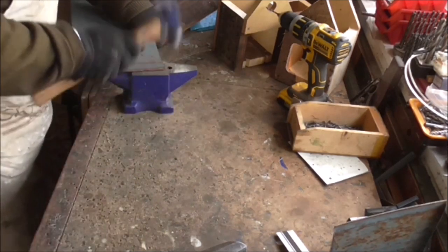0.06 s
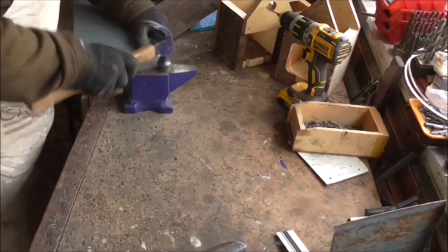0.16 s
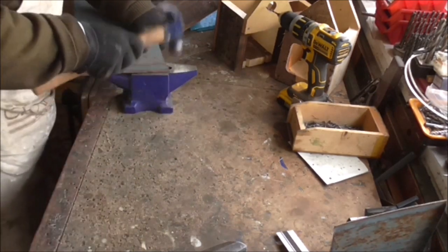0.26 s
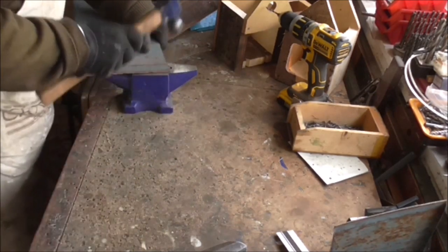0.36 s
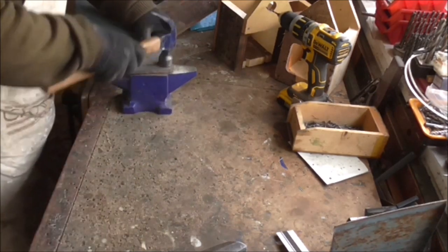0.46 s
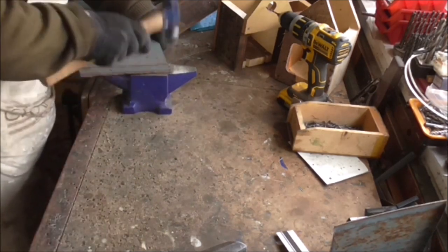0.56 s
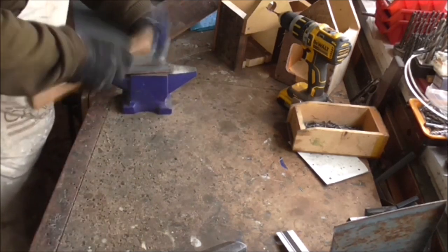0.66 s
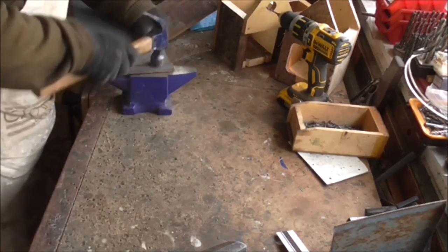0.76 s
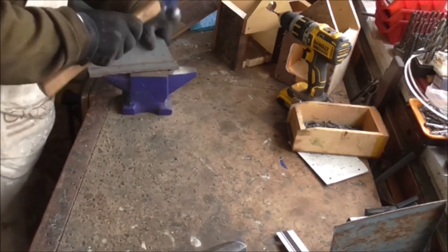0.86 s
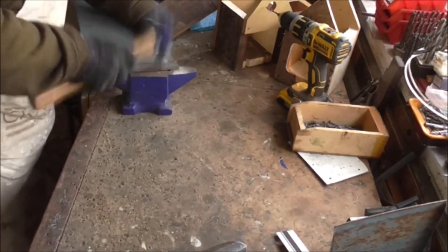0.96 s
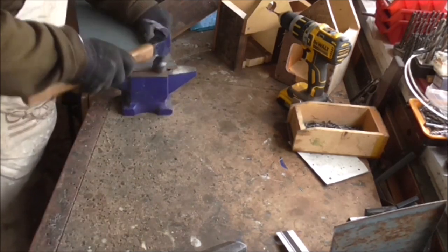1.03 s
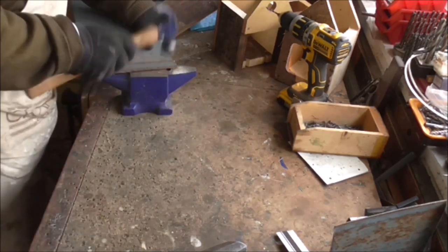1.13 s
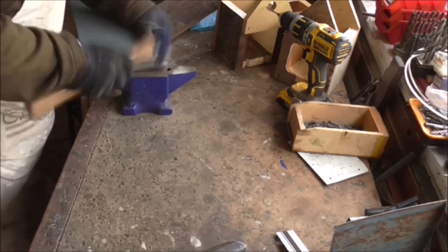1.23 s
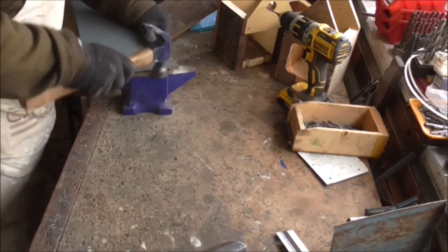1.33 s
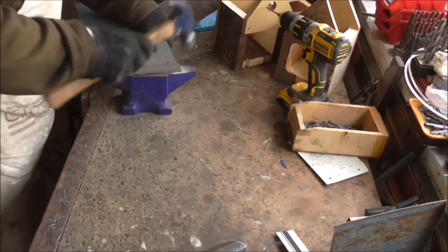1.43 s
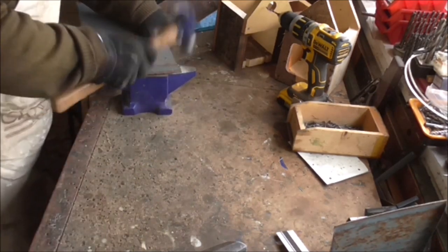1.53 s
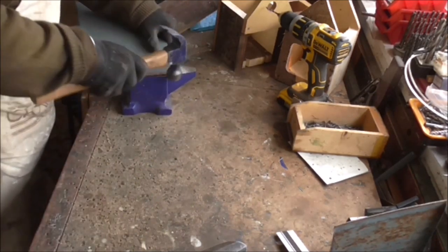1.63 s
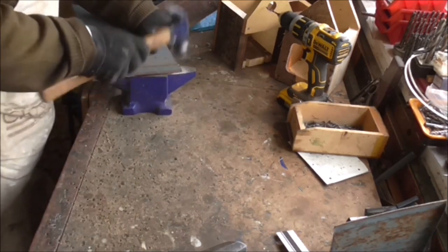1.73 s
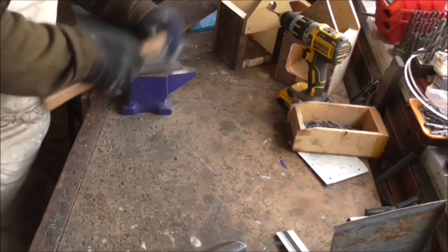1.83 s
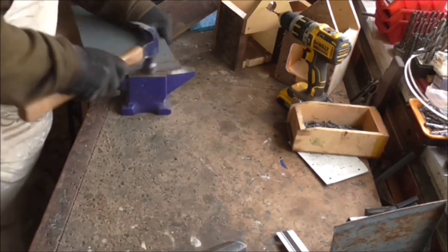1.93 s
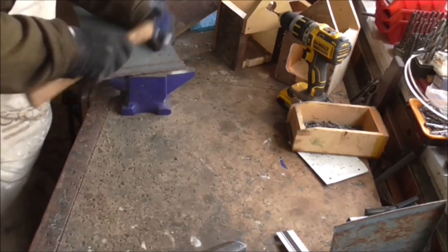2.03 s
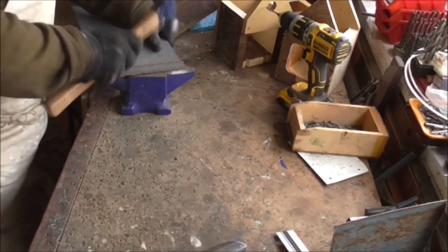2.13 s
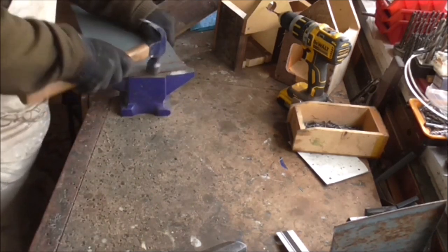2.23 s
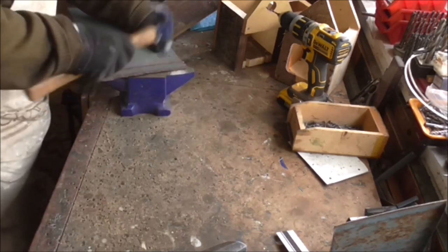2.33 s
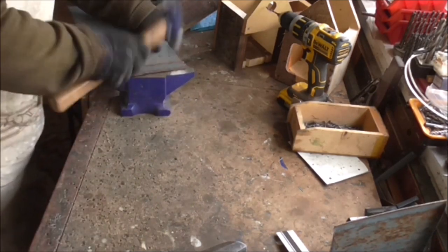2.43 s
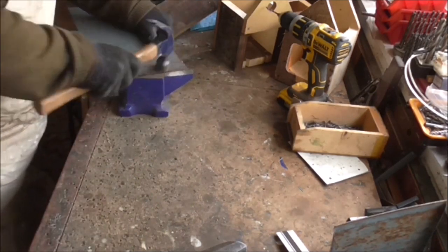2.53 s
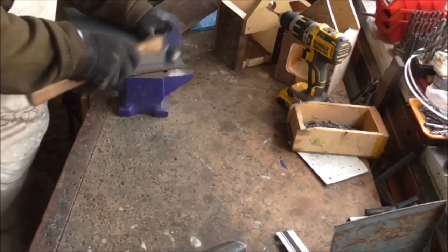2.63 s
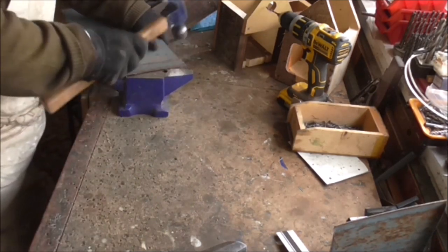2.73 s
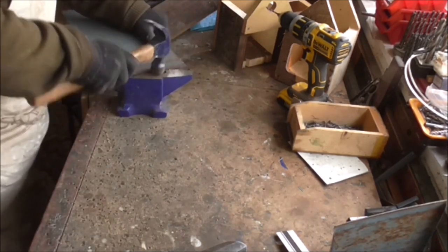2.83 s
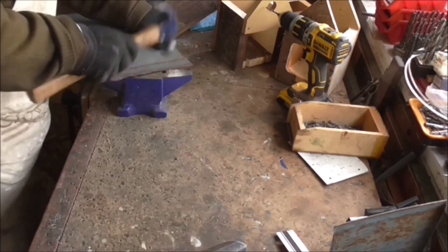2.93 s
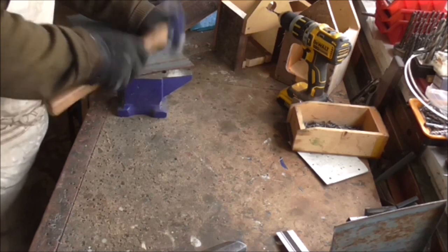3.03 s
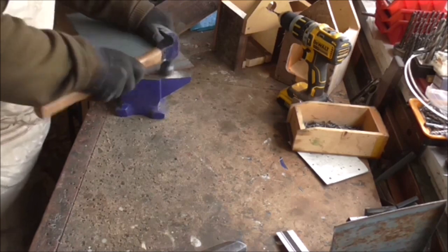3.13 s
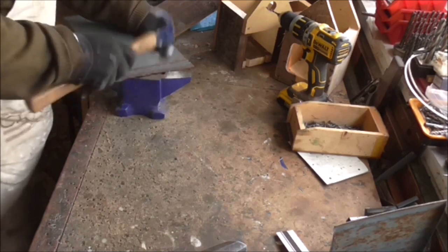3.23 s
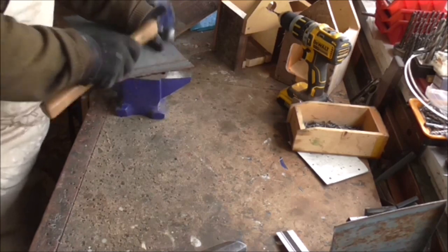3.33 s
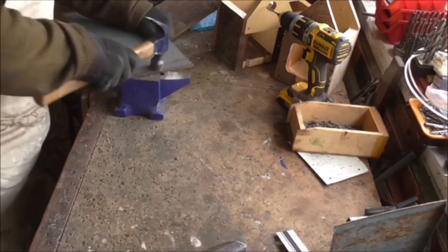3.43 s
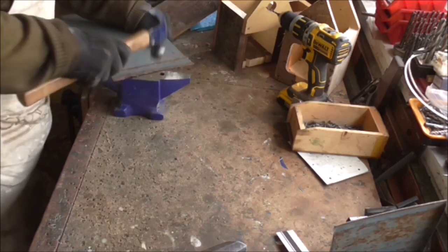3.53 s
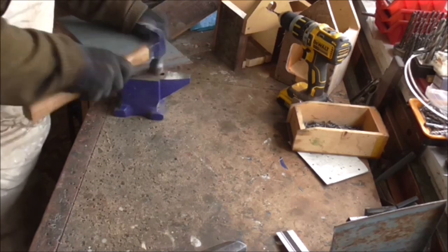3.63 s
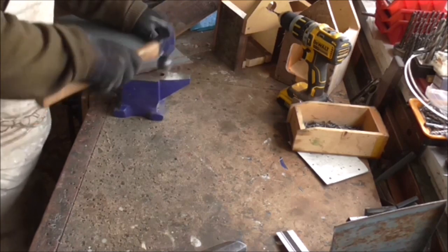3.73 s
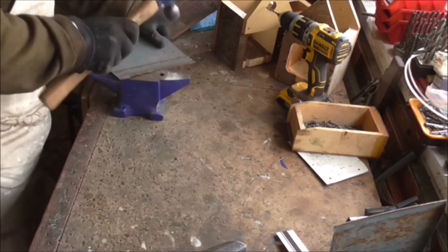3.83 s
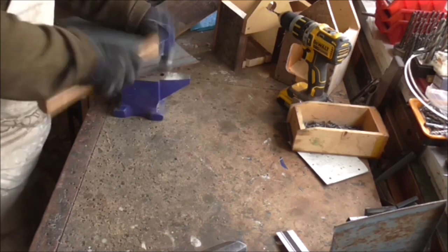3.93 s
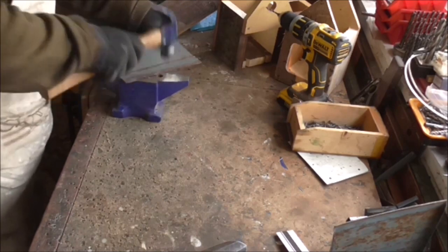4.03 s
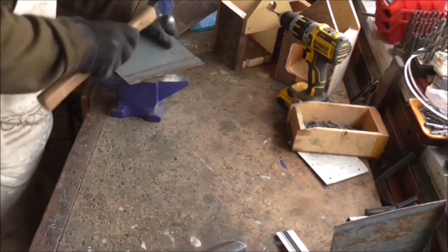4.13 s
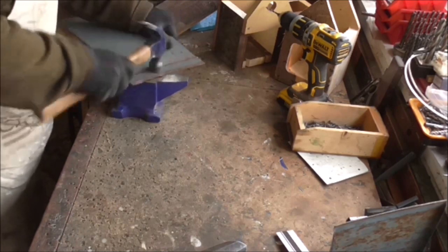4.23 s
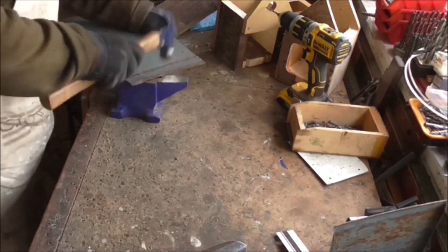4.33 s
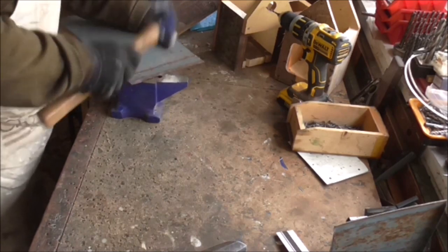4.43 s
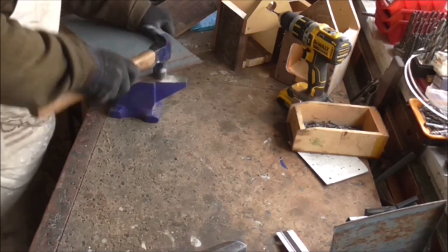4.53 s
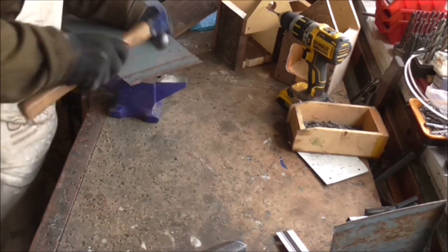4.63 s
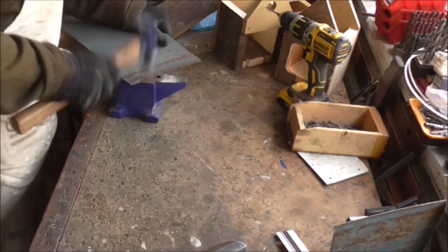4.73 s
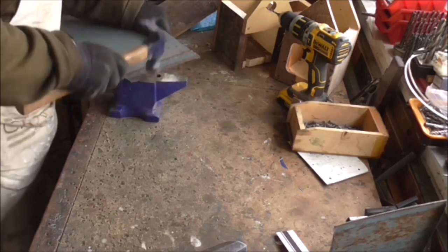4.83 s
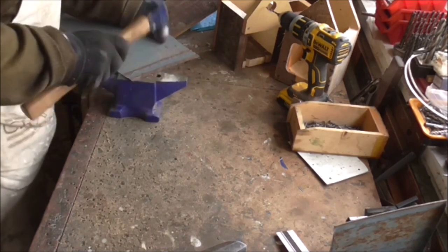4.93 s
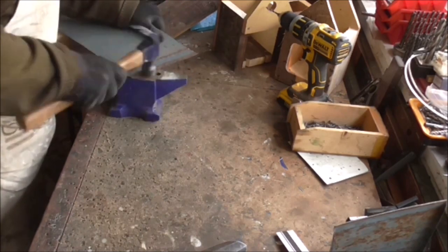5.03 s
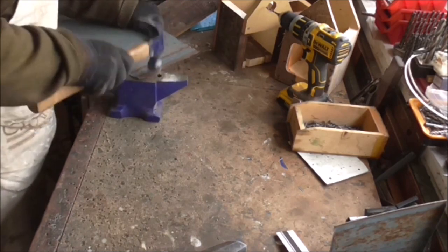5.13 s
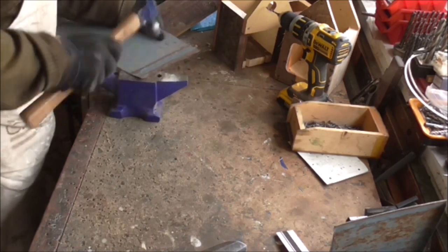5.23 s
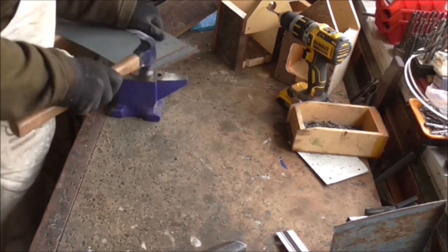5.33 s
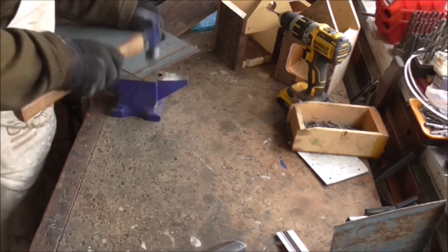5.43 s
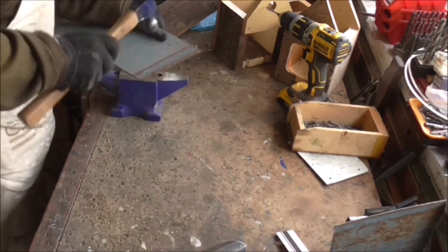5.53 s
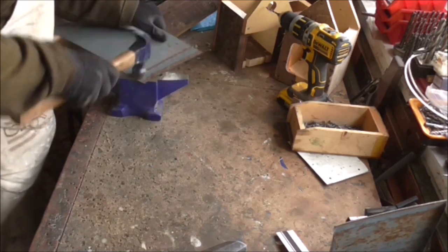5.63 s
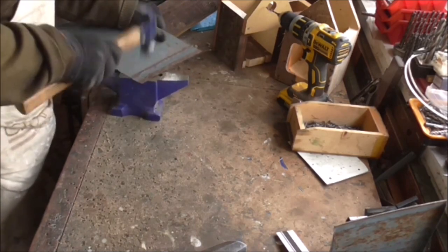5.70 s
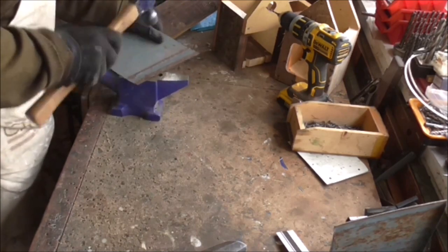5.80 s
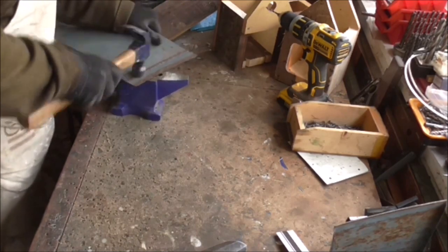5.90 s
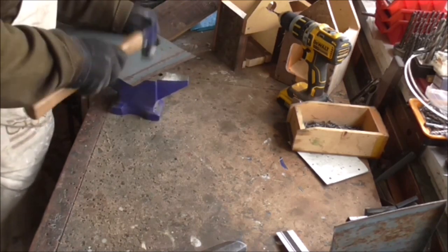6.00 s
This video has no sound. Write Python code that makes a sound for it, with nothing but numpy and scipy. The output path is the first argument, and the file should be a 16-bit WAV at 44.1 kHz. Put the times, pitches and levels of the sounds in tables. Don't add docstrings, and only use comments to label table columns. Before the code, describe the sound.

Close, loud hammering in a small workshop: hard metal clanks repeat at an almost even pace from start to end, varying in ring, crash and thud as the sheet shifts. The small anvil rings high and briefly, the bench booms and clatters underneath, and quiet slides and light touches of the sheet fill the gaps. Stereo, short room tail, limited peaks over low background air.

```python
import sys
import numpy as np
from scipy import signal
from scipy.fft import rfft, irfft, next_fast_len
from scipy.io import wavfile
from scipy.ndimage import uniform_filter1d, minimum_filter1d, map_coordinates

SR = 44100
rng = np.random.default_rng(int(sys.argv[2]) if len(sys.argv) > 2 else 0)


def inscribe(sig):
    pcm = np.round(np.clip(np.atleast_2d(sig).T, -1, 1) * 32767)
    wavfile.write(sys.argv[1], SR, pcm.astype(np.int16))


def magnitude_from_level(level_db):
    exponent = np.asarray(level_db, float) / 20
    return 10 ** exponent


N = 267378
LENGTH = SR // 2
T = np.arange(LENGTH) / SR
HZ = np.fft.rfftfreq(2 * LENGTH, 1 / SR)

# pitch in Hz, level in dB per Hz.
HUSH = [(25, 14.5), (60, 16.5), (150, 3), (600, 5.5), (2000, -6.5), (6000, -13.5), (15000, -46)]
# loudest moment in seconds, level in dB, rise in seconds, t60 in seconds,
# dullness in dB.
SLIDES = [(0.386, -59.5, 0.019, 0.27, 0.5), (0.583, -59, 0.0016, .06, 1), (1.404, -41, 0.0012, 0.032, 23),
          (1.619, -54, 0.052, 0.32, -6), (1.885, -68.5, 0.042, 1, -2), (2.113, -46, 0.012, 0.2, 9),
          (2.759, -63, 0.0087, 0.093, -11), (3.089, -65.5, 0.0054, 0.23, 14),
          (3.934, -67, 0.049, 0.77, -13), (4.288, -65.5, .002, 0.02, -8.5), (4.997, -52, 0.0093, 0.1, -2),
          (5.10, -66, 0.0059, .1, 19)]
# pitch in Hz, level in dB per Hz.
SLIDE_TONE = [(80, -19.5), (300, 2.5), (900, 2.5), (2500, -5.5), (5500, -2), (7500, -6), (11000, -14),
              (15500, -24), (16500, -67.5)]
# start in seconds, pitch in Hz, level in dB, t60 in seconds.
PINGS = [
    (1.925, 1590, -63, .6),
    (.39, 2300, -68, .5),
    (2.112, 703, -51.5, .25),
    (2.112, 2240, -61, .2),
    (3.088, 502, -56, 0.22),
    (4.78, 624, -64, .5),
]
# pitch in Hz, likeness from -1 to 1.
NEAR_ALIKE = [(30, 0.32), (200, 0.12), (700, 0.12), (2500, 0.46), (5000, 0.83), (9000, 0.22), (14000, 0.49)]
ROOM_ALIKE = [(30, 0.76), (200, 0.97), (600, 0.94), (1400, 0.25), (2800, 0.95), (5000, 0.2), (8000, 0.19),
              (10000, 0.062), (15000, .05)]
# pitch in Hz, left minus right in dB.
BALANCE_DB = [(60, 1.5), (300, -1.5), (700, -1.5), (1200, 0), (4000, 1.5), (9000, -0.5)]

# start in seconds, force in dB, spot along the face in steps from about -1.5 to 1, spot
BLOWS = [(-0.082, -14.5, -0.96, 0.24, -0.13), (0.2155, -15, -1.14, -0.13, 0.56),
         (0.5109, -13, 0.19, 0.24, 0.34), (0.797, -12, -0.29, 0.066, 0.42),
         (1.078, -13.5, -0.54, 0.049, 0.53), (1.3553, -13.5, -0.51, 0.69, -0.19),
         (1.6545, -16.5, 0.65, 0.33, -0.61), (1.962, -14, -0.42, 0.13, 0.17),
         (2.269, -14.5, 0.4, -0.16, -0.43), (2.5689, -14, -0.29, -0.18, -0.57),
         (2.8831, -15.5, -1.3, -0.072, 0.4), (3.172, -15.5, -0.15, -0.0023, -0.5),
         (3.465, -15, -0.46, -0.47, 0.17), (3.7488, -18.5, -0.26, 0.16, -1.05),
         (4.0347, -15, 0.59, 0.3, -1.1), (4.3083, -13, -1.43, 0.1, -0.09), (4.582, -14.0, -1.3, -0.4, 0.11),
         (4.8442, -19, 0.4, -0.44, -0.13), (5.1308, -15.5, 0.96, 0.3, -0.42),
         (5.408, -18.5, 0.82, -0.74, -0.3), (5.696, -15, 0.51, 0.18, 0.076),
         (5.9821, -13.5, -0.13, -0.09, 0.26)]
# level in dB over the force,
# dB per step along the face, dB per step across it, dB per step of flatness.
RING_LAW = [(-16, 2.1, -2, 3), (-26, -3, 7, -1), (-24, 0.3, 5, 6.5), (-23.5, 6.5, 2.3, 1.5),
            (-29.5, 5, 2, -6.5)]
SHEET_LAW = [(1.5, 2.1, -0.5, 0.5), (-19, 1, 0.5, 0.2), (-25.5, -0.5, -1, -2.8), (-9.5, 0, -1, -1.5),
             (-11.5, 1, 0, 0)]
COLOUR_HZ = [200, 750, 2200, 5000, 12000]

# pitch in Hz, strength in dB, t60 in seconds, ring group as a row of RING_LAW.
ANVIL_HZ = [3887, 3940, 4283, 4631, 4768, 4872, 4945, 5125, 5200, 5472, 5870, 6103, 7069, 7887]
ANVIL_DB = [0, -7, 1, -6, -13, -2, -10, -12, -13, 2.5, -11, -12, -9, -3]
ANVIL_T60 = [0.12, 0.077, 0.11, 0.044, 0.21, 0.11, 0.16, 0.013, 0.032, 0.11, 0.2, .1, 0.1, 0.11]
ANVIL_GROUP = [1, 1, 2, 0, 0, 0, 0, 0, 0, 3, 3, 3, 4, 4]

# pitch in Hz, width in Hz, height in dB.
RESONANCES = [(123, 13, -8), (156, 32, -7), (213.8, 31, 5.5), (292, 20, 3), (382, 59, -10.5), (543, 23, -5),
              (606, 18, -2), (683.7, 78, -1), (740, 59, -19.5), (1105, 69, -11.5), (1700, 80, -23),
              (1680, 420, -7.5)]
# pitch in Hz, level in dB per Hz.
CRASH_TONE = [(30, -38), (100, -13.5), (250, -6.5), (700, 2.5), (1500, -5), (3000, -11), (3700, -7.5),
              (4000, -0.5), (5000, 3), (6000, -3), (7000, -9), (10000, -15.5), (14500, -13), (16000, -35)]
# pitch in Hz, t60 in seconds.
CRASH_T60 = [(60, 0.24), (250, 0.068), (800, 0.07), (2500, 0.055), (5000, 0.081), (10000, 0.071),
             (16000, 0.015)]
ROOM_T60 = [(60, 0.37), (250, 0.29), (800, .29), (2500, 0.26), (5000, 0.26), (10000, 0.22), (15000, 0.059)]
# pitch in Hz, level in dB against the crash.
ROOM_DB = [(100, -2), (700, -5), (2500, -13.5), (5000, -13), (12000, -8.5)]

KNOCK_HZ = [117, 222, 281, 660, 560, 1132, 682, 2090]
# left level in dB, right level in dB, t60 in seconds, delay in seconds.
KNOCK = [(-13, -10, 0.16, 0.0046), (-6.5, 4, 0.071, .0045), (-11, -9, 0.36, 0.0044), (-3, 1, .025, 0.0015),
         (-23.5, 8, 0.053, 0.0025), (-15.5, -23, 0.052, 0.0033), (-4, -4.5, 0.28, .004),
         (-36, -36.5, .45, .002)]
# pitch in Hz, level in dB per Hz over the force.
JOLT_TONE = [(100, -12), (300, -4), (750, -1.5), (1500, -8.5), (2800, -15.5), (4500, -40.5)]
# delay in seconds, pressure, width in seconds.
CONTACT = [(-.0002, .4, .0001), (0, -.85, .00011), (.00056, 1.15, .00012), (.0008, -.7, .00011)]
# pitch in Hz, level in dB over the force, t60 in seconds.
CRACK = [(1500, -8, 0.0037), (2540, -6, 0.004), (3050, -6, 0.0079), (5120, -4, 0.01), (7300, -8, .005),
         (8500, -10, 0.006)]


def unit(x):
    return x / np.sqrt(np.mean(x ** 2) + 1e-20)


def along(points, hz):
    point_hz, value = np.transpose(points)
    return np.interp(np.log(hz + 1), np.log(point_hz + 1), value)


def chance(rate, count):
    knots = rng.standard_normal((count, 60))
    return np.array([map_coordinates(k, [T * rate], order=1) for k in knots])


def spread(pair, gain, alike, hz):
    turn = np.arccos(np.clip(along(alike, hz), -1, 1)) / 2
    mid, side = rfft(pair, 2 * len(hz) - 2) * gain * [np.cos(turn), np.sin(turn)]
    lean = magnitude_from_level(along(BALANCE_DB, hz) / 2)
    return irfft([(mid + side) * lean, (mid - side) / lean])[:, :pair.shape[1]]


def dying(t60s, gain, alike):
    noise = spread(rng.standard_normal((2, LENGTH)), gain, alike, HZ)
    hz, t, z = signal.stft(noise, SR, nperseg=256)
    fade = magnitude_from_level(-60 * t / along(t60s, hz)[:, None])
    return signal.istft(z * fade, SR, nperseg=256)[1][:, :LENGTH]


def empty_track():
    return np.zeros((2, N + 3 * SR))


def add(track, x, s):
    track[:, round((s + 1) * SR):][:, :x.shape[1]] += x


def hush():
    hz = np.fft.rfftfreq(2 * next_fast_len(N // 2 + 1), 1 / SR)
    t = np.arange(N) / SR
    whine = magnitude_from_level(-92) * np.clip(1.3 - t, 0, 1) * np.sin(2 * np.pi * 13170 * t)
    air = spread(rng.standard_normal((2, N)), magnitude_from_level(along(HUSH, hz)), NEAR_ALIKE, hz)
    return magnitude_from_level(-72) * unit(air) + whine


def slides():
    track = empty_track()
    for s, db, rise, t60, dull_db in SLIDES:
        tilt = along([(1500, dull_db), (4000, 0.013), (12000, -.8 * dull_db)], HZ)
        gain = magnitude_from_level(along(SLIDE_TONE, HZ) + tilt)
        puff = unit(spread(rng.standard_normal((2, LENGTH)), gain, ROOM_ALIKE, HZ))
        grit = magnitude_from_level(2.5 * map_coordinates(rng.standard_normal(200), [T * 180], order=1))
        swell = (1 - np.exp(-(T / rise) ** 2)) * (T < .3)
        add(track, magnitude_from_level(db - 60 * T / t60) * swell * grit * puff, s - rise)
    return track[:, SR:SR + N]


def pings():
    track = empty_track()
    for s, hz, db, t60 in PINGS:
        wander = np.cumsum(20 * chance(60, count=2), axis=1) / SR
        fade = magnitude_from_level(db - 60 * T / t60) * (1 - np.exp(-T / .012))
        add(track, fade * np.sin(2 * np.pi * (hz * T + wander)), s)
    return track[:, SR:SR + N]


def shimmer(count):
    low_hz, high_hz, level_db, t60 = 8200, 15300, -49, .17
    spot, size, life, ear = rng.random((count, 4)).T[:, :, None]
    hz = low_hz + (high_hz - low_hz) * spot
    fade = magnitude_from_level(level_db + 6 * size - 60 * T / (t60 * (0.55 + 0.73 * life)))
    lines = fade * np.sin(2 * np.pi * hz * T)
    return np.array([(lines * (.5 + ear)).sum(0), (lines * (1.5 - ear)).sum(0)])


def jolt():
    t60, rise, alike = 0.058, .002, -0.6
    clatter = dying([(100, t60)], magnitude_from_level(along(JOLT_TONE, HZ)), [(100, alike)])
    return clatter * (1 - np.exp(-(T / rise) ** 2))


def bench(boom_db, body_db):
    colour = list(zip(COLOUR_HZ, [boom_db, body_db, body_db, 0, 0]))
    knock = np.zeros((2, LENGTH))
    for hz, (left_db, right_db, t60, delay) in zip(KNOCK_HZ, KNOCK):
        t = np.maximum(T - delay, 0)
        db = along(colour, hz) + rng.normal(0, 0.66)
        sides = magnitude_from_level([[db + left_db], [db + right_db]])
        knock += sides * magnitude_from_level(-60 * t / t60) * np.sin(2 * np.pi * hz * t)
    return knock


def sheet(colour_db):
    peaks = sum(magnitude_from_level(db - 2.0) / (1 + (2 * (HZ - hz) / width) ** 2) for hz, width, db in RESONANCES)
    colour = along(list(zip(COLOUR_HZ, colour_db)), HZ)
    gain = magnitude_from_level(along(CRASH_TONE, HZ) + colour) * (1 + peaks)
    crash = dying(CRASH_T60, gain, NEAR_ALIKE) * (1 - np.exp(-T / 0.00042))
    room = dying(ROOM_T60, gain * magnitude_from_level(along(ROOM_DB, HZ)), ROOM_ALIKE)
    return crash + room * (1 - np.exp(-T / 0.0023))


def anvil(levels_db):
    rocking_db, wall_loss_db_per_half_octave, wall_t60 = 2, 5, 0.26
    group_db = np.array(levels_db)[ANVIL_GROUP]
    hz, db, t60 = np.array([ANVIL_HZ, ANVIL_DB + group_db, ANVIL_T60])[:, :, None]
    count = len(hz)
    detune, turn = rng.standard_normal((2, count, 1)) * [[[.001]], [[.05]]]
    phase = 2 * np.pi * (hz * (1 + detune) * T + turn)
    ring = magnitude_from_level(db + rocking_db * chance(60, count) - 60 * T / t60) * np.sin(phase)
    direct = ring * (1 - np.exp(-T / 0.0006))

    wall_loss = wall_loss_db_per_half_octave * np.maximum(np.log2(hz / 5500), 0) * 2
    fade = magnitude_from_level(db - 16 - wall_loss - 60 * T / wall_t60) * (1 - np.exp(-T / 0.0031))

    def echo():
        return (fade * (chance(36, count) * np.sin(phase) + chance(36, count) * np.cos(phase))).sum(0)

    mid, side = echo(), echo()
    return direct.sum(0) + mid + magnitude_from_level(-20) * side * [[1], [-1]]


def crack():
    hz, db, t60 = np.transpose(CRACK)[:, :, None]
    hz = hz * (1 + .07 * rng.standard_normal(hz.shape))
    return (magnitude_from_level(db - 60 * T / t60) * np.sin(2 * np.pi * hz * T)).sum(0)[None]


def contact(clang_db, sizzle_db):
    click = sum(size * np.exp(-.5 * ((T - .0005 - delay) / width) ** 2) for delay, size, width in CONTACT)
    bright_noise = np.diff(rng.standard_normal(LENGTH + 1))
    hiss = bright_noise * magnitude_from_level(-60 * T / 0.027) * (1 - np.exp(-T / 0.0001))
    return magnitude_from_level(clang_db) * click + magnitude_from_level(sizzle_db) * hiss * np.ones((2, 1))


def hammer():
    track = empty_track()
    for s, force_db, *spot in BLOWS:
        rings_db = force_db + np.array(RING_LAW) @ [1, *spot]
        splash_db, *colour_db = force_db + np.array(SHEET_LAW) @ [1, *spot]
        boom, body, clang, sizzle = np.array(colour_db) - splash_db
        sheet_colour_db = [boom + 21, body + 19, clang + 13, 0, sizzle + 14]
        add(track, contact(splash_db + clang + 7, splash_db + sizzle + 4), s)
        add(track, magnitude_from_level(force_db) * (crack() + jolt() + shimmer(count=60)), s + 0.00066)
        add(track, magnitude_from_level(15) * anvil(rings_db), s + .0003)
        add(track, magnitude_from_level(splash_db + 5.0) * sheet(sheet_colour_db), s + .0001)
        add(track, magnitude_from_level(splash_db + 2.5) * bench(boom, body), s - .0002)
    return track[:, SR:SR + N]


def scene():
    return hush() + slides() + pings() + hammer()


def band_limit(x):
    return signal.sosfilt(signal.butter(12, 16800, fs=SR, output="sos"), x)


def record(dry):
    need = np.minimum(1, 0.37 / (np.abs(dry).max(0) + 1e-9))
    ahead = round(.009 * SR)
    gain = uniform_filter1d(minimum_filter1d(need, 2 * ahead), ahead // 2)
    x = dry * gain ** 0.5
    x = x / (1 + np.abs(x / 0.23) ** 3) ** (1 / 3)
    x = signal.sosfilt(signal.butter(2, 75, "high", fs=SR, output="sos"), x)
    x = signal.sosfilt(signal.cheby2(10, 50, 16700, fs=SR, output="sos"), x)
    return band_limit(x)


dry = scene()
out = record(dry)
inscribe(out)
```